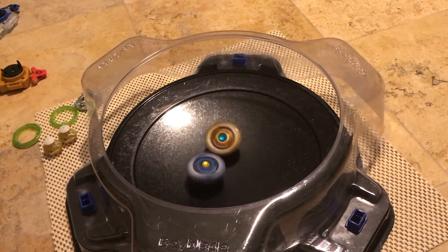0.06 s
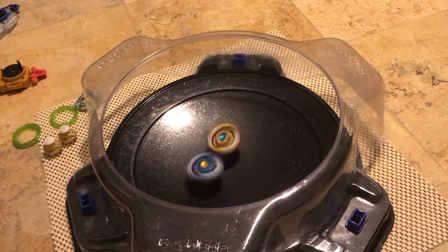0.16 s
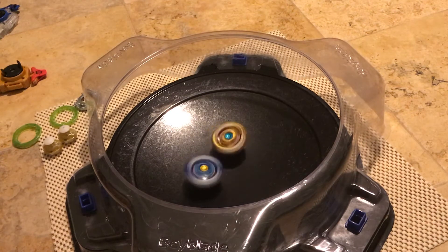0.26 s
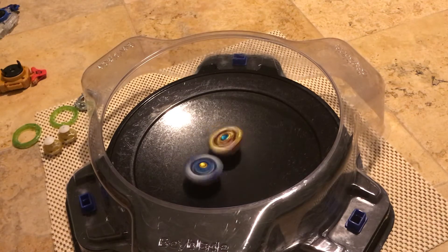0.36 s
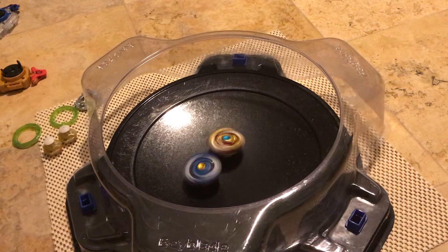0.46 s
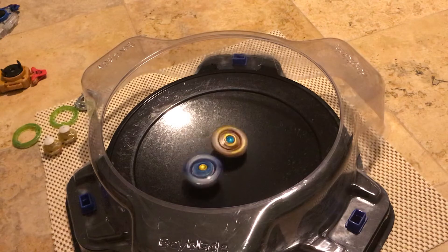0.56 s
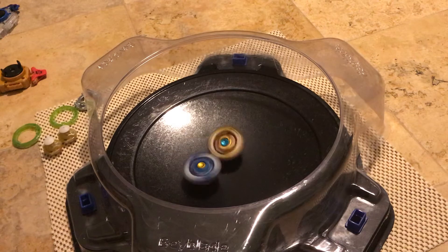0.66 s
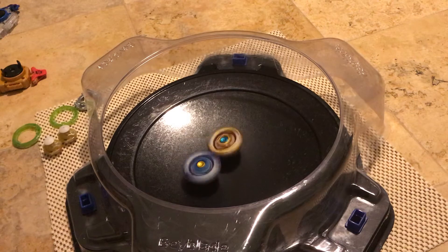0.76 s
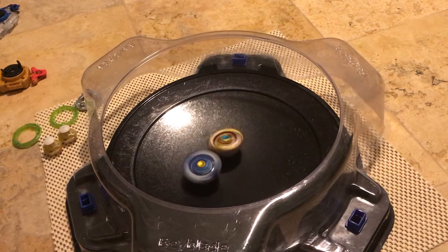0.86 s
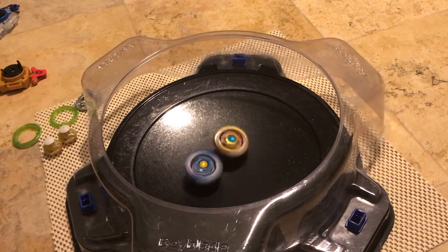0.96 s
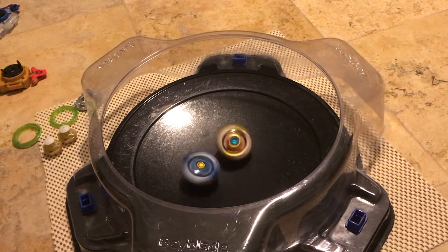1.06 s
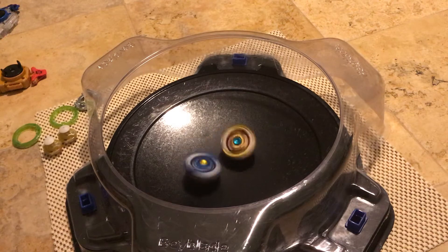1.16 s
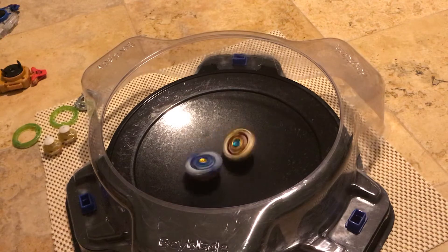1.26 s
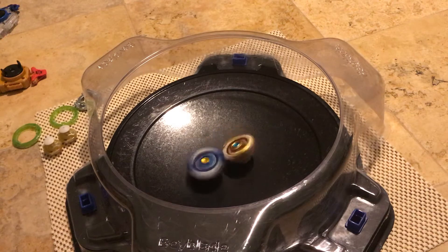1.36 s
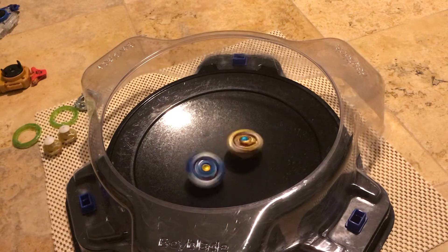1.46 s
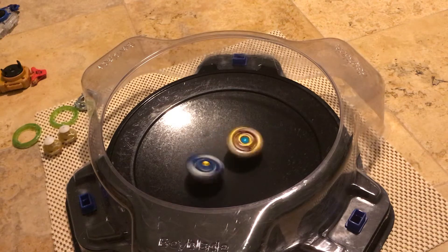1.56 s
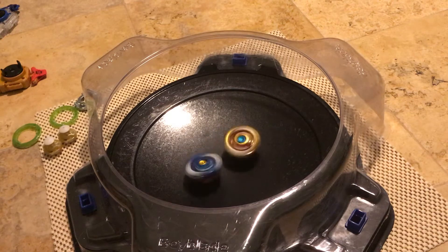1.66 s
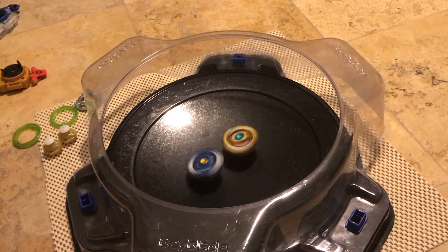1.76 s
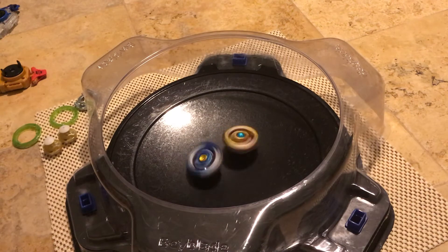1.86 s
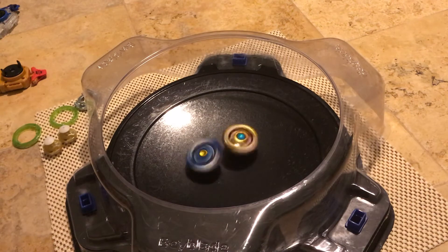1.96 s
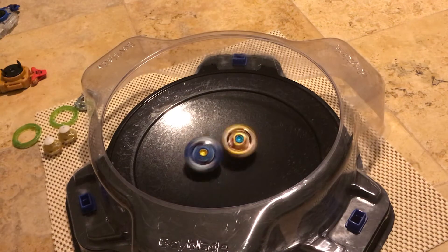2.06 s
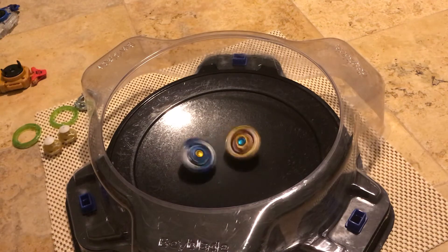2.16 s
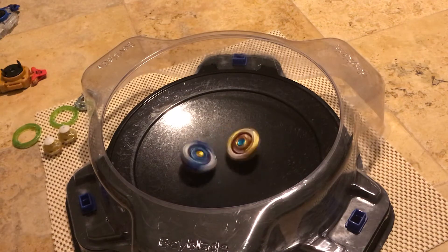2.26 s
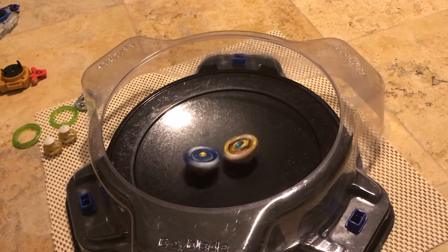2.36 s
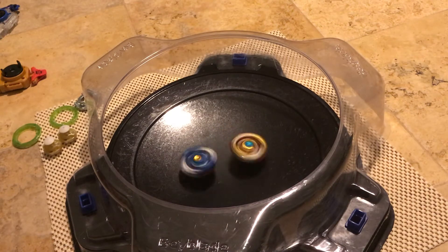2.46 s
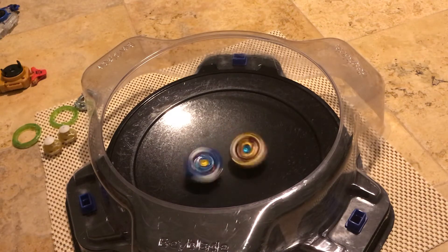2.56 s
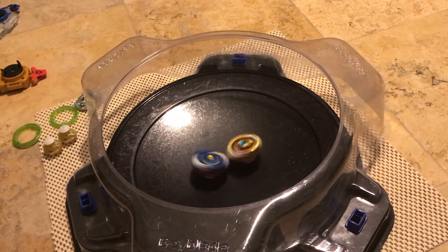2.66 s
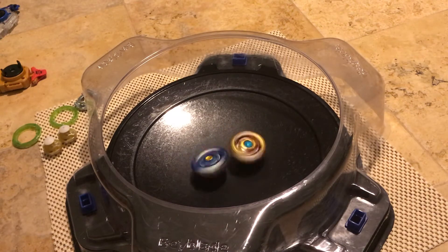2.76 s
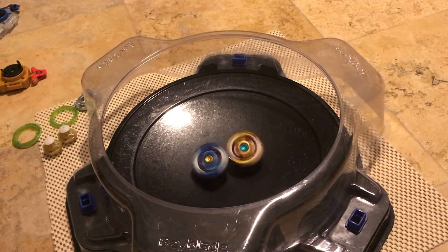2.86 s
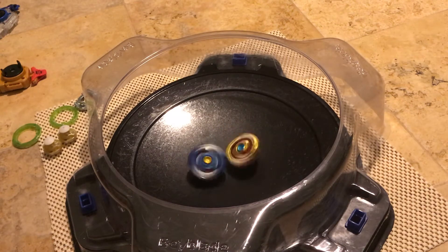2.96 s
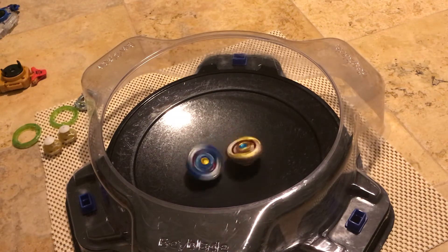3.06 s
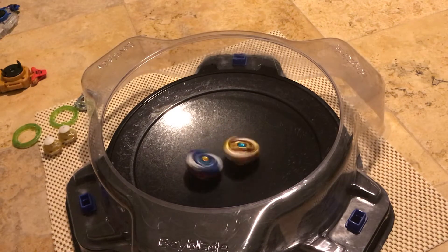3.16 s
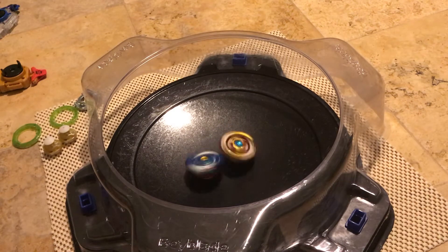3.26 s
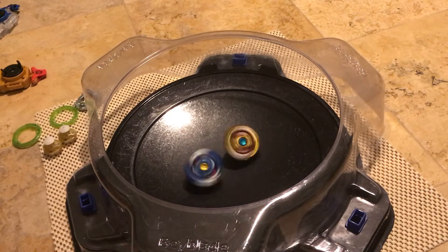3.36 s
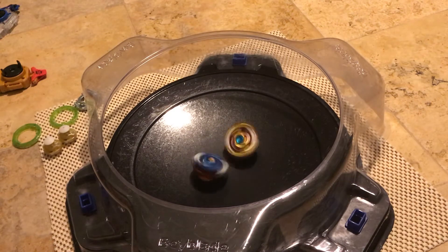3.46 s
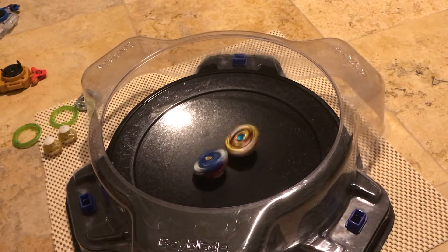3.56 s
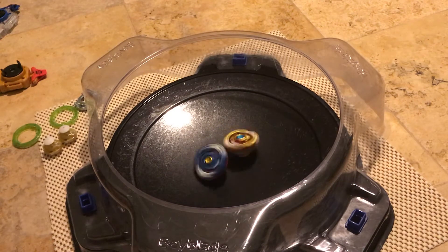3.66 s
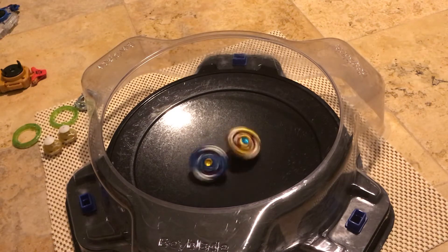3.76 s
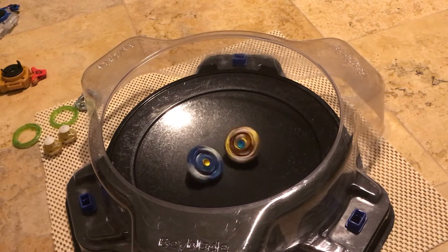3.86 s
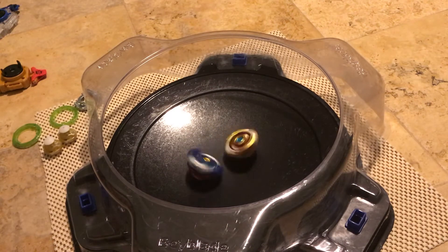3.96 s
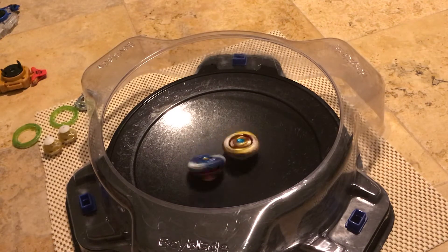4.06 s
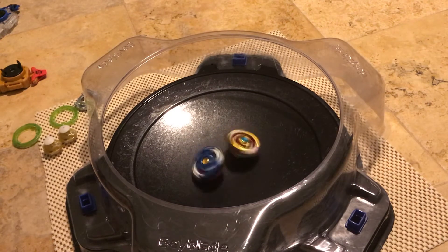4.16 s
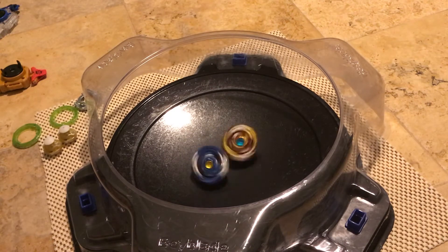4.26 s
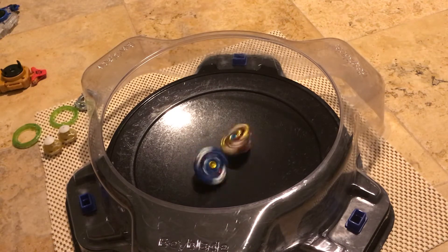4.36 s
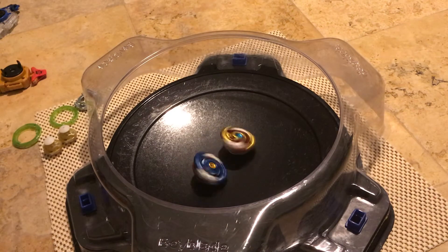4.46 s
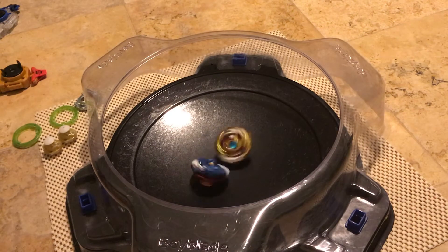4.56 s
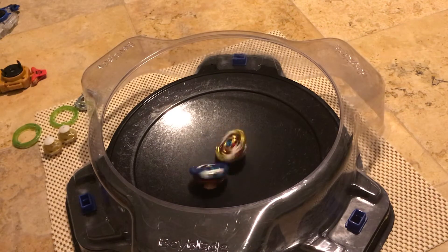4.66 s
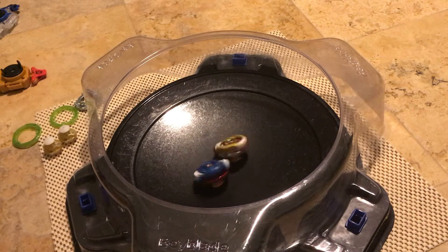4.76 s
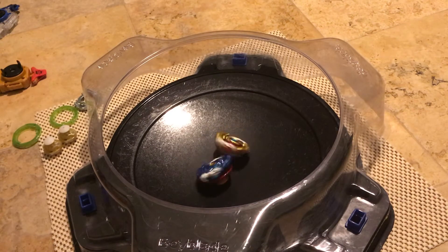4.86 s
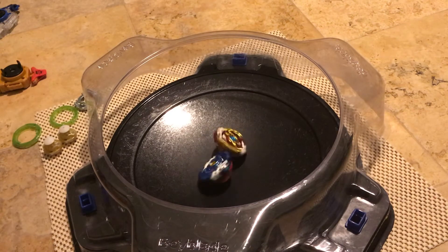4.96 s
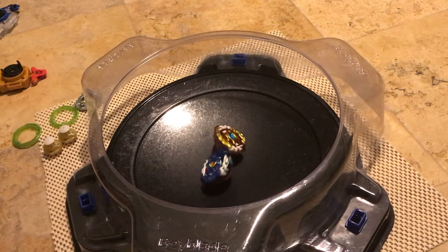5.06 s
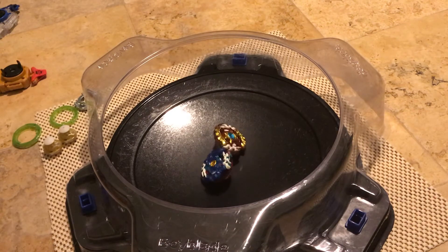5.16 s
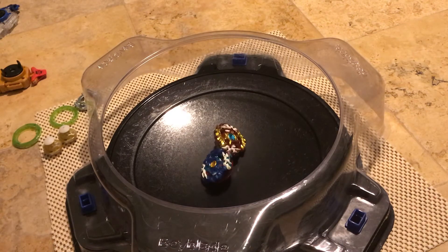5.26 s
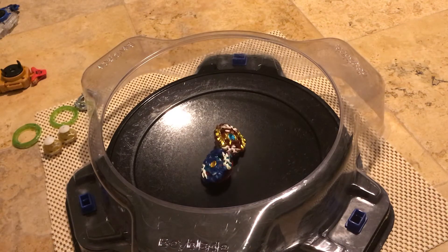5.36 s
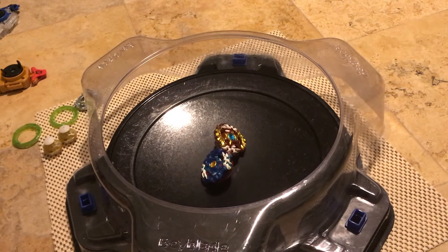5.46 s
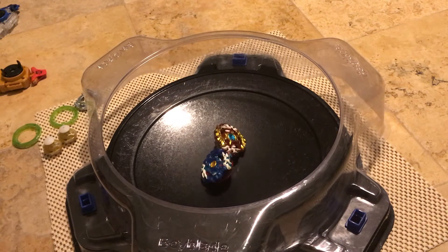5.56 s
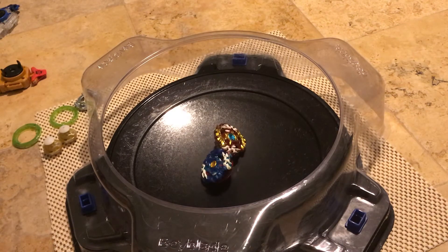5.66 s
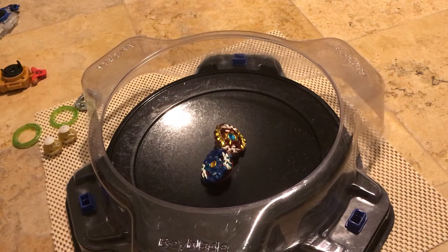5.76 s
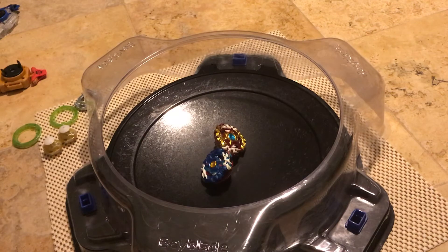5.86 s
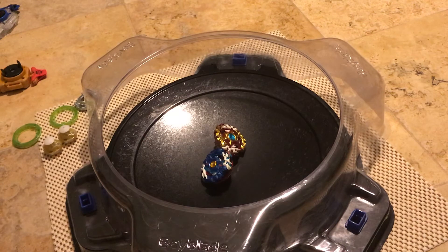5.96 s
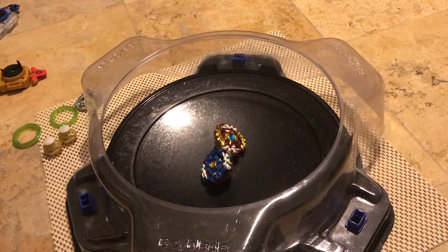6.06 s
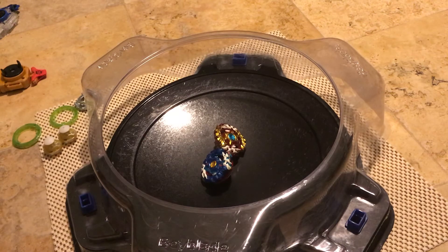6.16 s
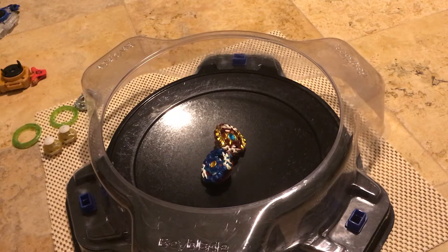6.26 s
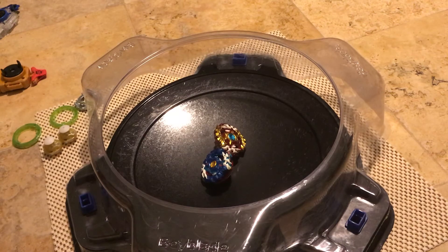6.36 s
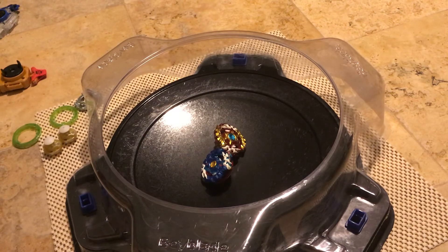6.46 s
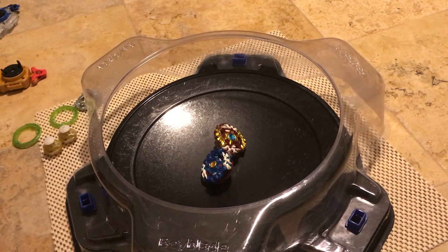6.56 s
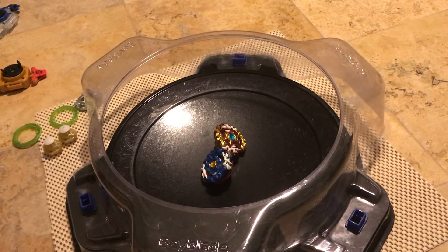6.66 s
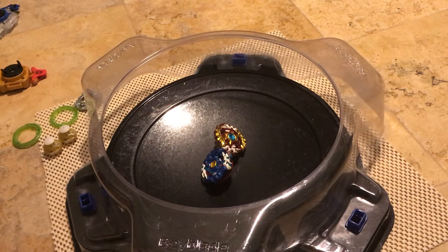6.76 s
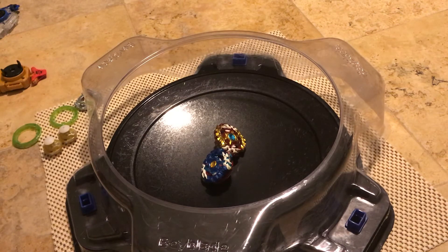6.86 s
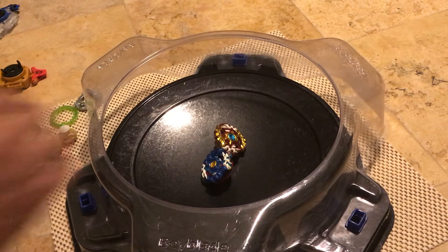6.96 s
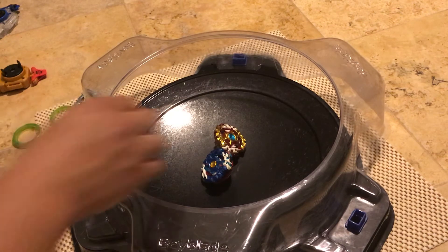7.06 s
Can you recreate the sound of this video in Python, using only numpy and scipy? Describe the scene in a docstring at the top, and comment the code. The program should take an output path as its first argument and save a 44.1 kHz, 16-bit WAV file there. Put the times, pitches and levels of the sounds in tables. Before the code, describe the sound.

Near the microphone, in a reverberant room, two tops whir in a plastic bowl with a thin, gritty, throbbing grind. Faint ticks begin at once; a sharp clack comes at 0.25 s, a close pair near 0.53, then strong cracks at 0.95 and 1.1, and the hardest, brightest snap at about 1.47. Some blows leave a tiny high metallic ring, and the scrape flares after each. From 2.1 to 3.0 medium clacks come in irregular groups, with another bright crack at 3.36. Between 3.7 and 4.95 the hits turn weaker, lower and more rattling as the tops wobble over. Small ticks fade out by 5.35. Then near-silence: faint hiss, low rumble, a barely audible electronic whine, soft cloth swishes around 5.6-5.8 and a very faint squeak. From 6.8 light hand taps and rustling lead to a loud, dry double plastic clack at 7.09, at the very end.

```python
"""Two spinning tops clash and wobble in a plastic bowl on a tiled floor until both fall over.
Impact noise drives the resonances of bowl and rims and rings the metal as decaying modes.
Random grit under the tips makes the grind; cloth is shaped noise, and a hand's raps excite small plastic.
A reverberant room answers, over faint wavering tones, microphone hiss, rumble and an electronic whine."""
import sys
import numpy as np
from scipy import signal
from scipy.fft import rfft, irfft, next_fast_len
from scipy.io import wavfile
from scipy.ndimage import map_coordinates

SR = 44100
rng = np.random.default_rng(int(sys.argv[2]) if len(sys.argv) > 2 else 0)


def to_wav(sig):
    """Store sig (one row per channel, or 1-D mono) as 16-bit WAV at the path in sys.argv[1].

    Samples outside -1..1 are clipped; the rate is SR.
    """
    pcm = np.clip(np.atleast_2d(sig), -1, 1) * 32767
    pcm = np.round(pcm).astype(np.int16)
    wavfile.write(sys.argv[1], SR, pcm.T)  # frames by channels


N = 313551

# Rim against rim: start_s, crack_peak_db, crack_band_hz, broad_db (re main band), treble_peak_db,
# body_peak_db, knock_peak_db, length_ms (to -60 dB), ring_db (one for each metal part)
RIM_CLASHES = [(0.2455, -6.5, 9560, 2.5, -15, -14.5, -29, 31, [-47, -47, -50, -52]),
               (0.5258, -18.5, 5800, 5, -31, -25.5, -29.5, 62, [-59, -63, -58, -56]),
               (0.5401, -8, 8700, 2, -20, -15, -38, 5.7, [-50, -58, -35, -48]),
               (0.8556, -27.5, 5640, 7, -57, -24.5, -40.5, 23, [-73, -69, -66, -72]),
               (0.9477, -14.5, 8970, -4.5, -23, -17, -32.5, 39, [-54, -44, -40, -59]),
               (1.1034, -5, 8700, 1.5, -16, -15, -27.5, 22, [-44, -45, -50, -57]),
               (1.4244, -12.5, 5530, 9, -18, -15, -27, 24, [-32.5, -37, -38, -54]),
               (1.4678, 1.5, 9170, -11.5, -6, -13, -26.5, 14, [-44, -44, -35, -50]),
               (1.9275, -30, 8200, -8, -59, -50, -41, 18, [-76, -72, -72.5, -73]),
               (2.155, -14.5, 7000, 15, -36, -19.5, -31.5, 17.7, [-42, -42.5, -56, -60]),
               (2.4718, -17.5, 9050, 1, -32, -20.5, -30, 29, [-61, -59, -56, -60]),
               (2.4954, -14.5, 8550, -2.5, -40, -22.5, -35.5, 33, [-44, -50, -57, -58]),
               (2.6824, -41, 4500, 1.5, -64, -56, -51, 19, [-75, -51, -75, -67]),
               (2.752, -17.5, 8550, -4.5, -28, -23, -33, 11.3, [-64, -62, -58, -65]),
               (2.8826, -17.5, 7550, 4, -45, -20.5, -34, 3.7, [-65, -67, -58, -66]),
               (2.9488, -22, 5940, 11, -27.5, -23.5, -37, 23, [-70, -63, -62, -62]),
               (3.024, -16, 7500, 15, -37, -21, -31.5, 29, [-43, -53, -54, -35]),
               (3.3577, -7.5, 8940, -21, -14, -20, -28, 14.6, [-58, -64, -37, -53]),
               (3.7206, -28, 5660, 27, -52, -27, -39, 37, [-58, -68, -64, -69]),
               (3.7968, -30.5, 7060, -15, -49, -26.5, -38, 69, [-68, -40, -66, -54]),
               (3.8129, -17, 3500, -3, -26, -19.5, -20.5, 35, [-45, -40, -59, -63]),
               (4.1937, -25, 7780, -81, -27, -25, -54, 56, [-53, -54, -66, -70]),
               (4.4114, -15.5, 7860, 25, -27, -21, -27.5, 57, [-56, -39.5, -61, -60]),
               (4.6925, -19, 7740, 2, -29, -22.5, -24, 69, [-55, -39, -62, -52]),
               (4.7066, -21, 4370, -23, -39, -22.5, -33, 11, [-63, -66, -63, -69]),
               (4.8976, -28.5, 5440, -11, -32, -29.5, -28, 19, [-55, -69, -65, -54]),
               (4.9479, -28.5, 8700, -10, -38, -30.5, -38, 19, [-72, -82, -70, -70])]
# Touches too weak to ring the metal: start_s, crack_peak_db, crack_band_hz, body_peak_db, knock_peak_db
LIGHT_TOUCHES = [(0.025, -39.5, 6860, -40, -53), (0.0425, -35, 7240, -38, -43),
                 (0.0647, -32.5, 4930, -34, -40.5), (0.13, -49, 7440, -55, -51),
                 (0.222, -54, 7050, -65.5, -54), (0.235, -42, 5000, -39, -48),
                 (0.4431, -34, 4300, -30.5, -40.5), (0.708, -43, 3530, -37, -50),
                 (0.7604, -42, 7100, -39.5, -51), (0.7751, -39, 6740, -42, -47),
                 (0.7988, -54, 4650, -39, -51), (1.091, -38, 3500, -40.5, -48.5),
                 (1.306, -35, 8700, -32, -38.5), (1.6823, -36, 5600, -51, -39),
                 (1.7236, -40, 8770, -36, -41), (1.738, -44, 8650, -37, -64),
                 (1.8708, -33.5, 5950, -36, -64), (1.9066, -61, 3620, -38, -55.5),
                 (1.9802, -39.5, 5550, -39.5, -48), (2.0674, -33.5, 5640, -36.5, -52.5),
                 (2.089, -47, 8500, -43, -63), (2.2722, -51, 4490, -50, -50),
                 (2.3495, -34, 5940, -33.5, -41), (2.3727, -38, 4840, -38, -53),
                 (2.4003, -44.5, 4820, -42, -41), (2.4498, -43, 6180, -40, -44),
                 (2.719, -35, 6100, -35.5, -41.5), (2.9864, -35.5, 6660, -32, -55),
                 (3.1899, -57, 3900, -32.5, -46), (3.2743, -44, 9000, -37.5, -39),
                 (3.338, -52, 3500, -49, -58), (3.3538, -20, 3500, -24.5, -54),
                 (3.5507, -46.5, 8900, -37, -40.5), (3.66, -45, 5100, -40, -39.5),
                 (3.7082, -32, 4100, -29.5, -35.5), (3.8236, -22, 5200, -19, -39),
                 (3.8376, -29, 9700, -22, -51), (4.026, -52, 3920, -66, -36),
                 (4.0877, -51, 5010, -39, -39.5), (4.135, -46, 5620, -39, -51),
                 (4.151, -37, 5560, -38, -30.5), (4.1738, -52, 5750, -33.5, -35),
                 (4.3184, -44, 7400, -40.5, -36.5), (4.359, -54, 4684, -48, -47),
                 (4.383, -60, 3500, -47, -58), (4.6591, -63, 3570, -43, -38),
                 (4.7219, -27.5, 4430, -25, -29), (4.8617, -43, 4490, -40, -32),
                 (4.9205, -34.5, 5730, -31, -59), (5.0481, -35.5, 5720, -36.5, -35.5),
                 (5.0592, -49, 5960, -31, -54), (5.1037, -60, 5540, -34.5, -43.5),
                 (5.1752, -54, 4200, -37.5, -44), (5.2436, -46, 3500, -38, -43.5),
                 (5.35, -68.5, 3500, -61.5, -51.5)]
# Modes of the tops' metal parts, one list a part: mode_hz, level_db (re part), t60_s
METAL_PARTS = [
    [(8311, -1.5, .22), (10010, 0.5, .32), (11550, -4, .25)],
    [(4492, 0, .38), (13412, -2.5, .22)],
    [(8972, 0.5, .17), (12590, -0.5, .17)],
    [(15102, 0.5, .25), (13815, -9, .25)],
]
# Low resonances of the bowl: centre_hz, width_hz, level_db
BOWL_KNOCK_MODES = [(91.5, 47, -12), (115.8, 36, -4), (165, 35, -6), (245.2, 40, -3), (311, 27, 2.5),
                    (347.5, 11, 3.5), (410, 21, -0.5), (481.5, 73, -6.5), (610, 44, -4), (760, 110, -7)]
# High resonances of the bowl: centre_hz, width_hz, level_db
BOWL_BODY_MODES = [(982, 240, -6.5), (1127, 75, -1.5), (1163, 66, -4.5), (1543, 92, 4), (1920, 90, -21),
                   (2858, 544, -3), (2852, 180, -1.5), (3268, 720, -1)]
# Tips running on the bowl, before the jolts of clashes: time_s, boom_db, scrape_db
TIP_GRIND = [(0.0, -53.5, -56.5), (0.4, -62, -52.5), (0.85, -70, -63.5), (1.1, -54.5, -49.5),
             (1.6, -58.5, -48.5), (2.05, -61.5, -58), (2.35, -52.5, -49), (2.7, -69, -54.5),
             (3.3, -54, -51), (3.8, -53.5, -53), (4.3, -55, -52.5), (4.7, -53, -53), (4.95, -68.5, -49),
             (5.2, -71.5, -61.5), (5.4, -73, -77)]
# Relative spectrum of the thin fizz of the tips: frequency_hz, level_db
FIZZ_SPECTRUM = [(1760, -26.5), (3000, -13), (3750, -3), (4600, -7), (4930, 11.5), (13000, -8), (16000, -4)]
# Taps of the hand: start_s, peak_db, length_ms (to -60 dB), band_hz, band_db, treble_db
HAND_RAPS = [(6.79, -51, 10, 3960, -4.5, 5), (6.819, -53.5, 8.5, 2270, -5, -27),
             (6.922, -42.5, 22, 3330, 11, -23), (6.94, -46.5, 21, 3540, 11, -13),
             (7, -50, 10, 3410, -7, -22), (7.088, -14.5, 6.9, 2840, -11, -7.5),
             (7.0905, -13, 14, 2690, -9, -29), (7.101, -32, 10, 2520, 15, -16)]
# Resonances of the rapped plastic: centre_hz, width_hz, level_db
RAPPED_MODES = [(990, 64, 6.5), (2080, 150, -2), (2865, 80, 11), (3500, 490, -5.5), (4550, 320, 7.5),
                (6380, 340, -7), (7400, 310, -20), (3210, 7200, -8.5)]
# Sleeve and hand drawing near: time_s, low_db, high_db
HAND_REACH = [(5.399, -80, -85), (5.8, -72, -79.5), (5.97, -70.5, -91), (6.15, -82, -89.5),
              (6.671, -80, -90), (6.8, -66, -76), (6.915, -62, -69.5), (6.928, -55.5, -57.5),
              (6.97, -62, -67.5), (7.11, -64.5, -70)]
# Swishes of cloth: peak_s, low_db, high_db
CLOTH_SWISHES = [(5.626, -79, -62.5), (5.79, -77.5, -62.5)]
# Decay time of the room: frequency_hz, t60_s
ROOM_DECAY = [(150, .5), (500, 0.54), (2000, 0.38), (6000, 0.34), (15000, 0.29)]
# Brief far squeak: start_s, end_s, pitch_hz, level_db (about rms)
FAR_SQUEAK = [(5.81, 6.08, 972, -76), (5.8, 6.15, 1960, -76), (5.85, 6.12, 2411, -77),
              (6.08, 6.2, 2790, -81)]
# Relative spectrum of the rumble: frequency_hz, level_db
RUMBLE_SPECTRUM = [(15, -27.5), (30, -8), (52, 4), (85, -5), (125, -12), (214, -24), (320, -43.5),
                   (550, -120)]
# Swells of the rumble: peak_s, level_db
RUMBLE_SWELLS = [(0.06, -54), (4.45, -60), (4.6, -60), (4.75, -58), (5.35, -51), (5.47, -53), (5.8, -61),
                 (6.28, -64), (6.45, -64)]
# Relative spectrum of the microphone hiss: frequency_hz, level_db
HISS_SPECTRUM = [(88, -27.5), (150, -2.5), (905, -16), (1020, -12), (1790, -19), (1940, -22), (2450, -18),
                 (3040, -17.5), (3490, -22.5), (7180, -25.5), (16000, -25.5)]
# Levels of the whine's harmonics: frequency_hz, level_db (rms)
WHINE_LEVELS = [(994, -83), (3000, -86), (7000, -90), (15000, -98)]

TOUCH_BROAD_DB, TOUCH_TREBLE_DB, TOUCH_MS = -12, -21.5, 22  # re main band, re crack, length
TREBLE_HZ = 10740  # centre of the crack's upper band
EDGE_RISE_S = 0.001
FIZZ_DB = -12  # re scrape while the tops run calm
JOLT_DB = [-47, -45, -50]  # boom, scrape, fizz after a 0 dB crack
JOLT_DB_PER_DB, JOLT_RISE_S, JOLT_T60_S = 0.32, .01, 0.46  # growth with the crack's level, times
SWISH_RISE_S, SWISH_T60_S = .13, .05
DULL_CLOTH = [(150, -37.5), (400, 7), (1500, 2.5), (2900, -4), (3460, -2.0), (4100, -8), (8000, -27)]
THIN_CLOTH = [(1500, -1), (3500, 5.5), (9000, 3.5), (15000, 1.0)]  # both: frequency_hz, level_db
RUMBLE_DB, RUMBLE_RISE_S, RUMBLE_T60_S = -67.5, .07, 1.0
HISS_DB, WHINE_HZ = -69.5, 994.1
ROOM_DB, CEILING, TOP_HZ = -6.0, .97, 15800  # room level, full-scale limit, band limit


def contacts():
    """Impact excitation: a short rattle of edges drives crack, bowl body and knock; hard blows ring metal."""
    out, t = np.zeros((2, N + SR)), np.arange(SR // 3) / SR
    touches = [(s, db, hz, TOUCH_BROAD_DB, db + TOUCH_TREBLE_DB, body, knock, TOUCH_MS, [])
               for s, db, hz, body, knock in LIGHT_TOUCHES]
    for s, db, hz, broad_db, treble_db, body_db, knock_db, ms, rings_db in RIM_CLASHES + touches:
        edges = burst(t, ms)
        crack = struck(edges, bright_band(hz, 1100, 6500, broad_db), db)
        treble = struck(edges, bright_band(TREBLE_HZ, 1800, 12500, -6), treble_db)
        body = struck(edges, bowl_body(), body_db)
        start = round(s * SR)
        sound = crack + treble + body + bowl_knock(t, edges, knock_db)
        # a thin tone beams little into the room: direct and room gains
        sound = sound + metal_ring(t, rings_db) * np.array([[.9], [.6]])
        out[:, start:start + len(t)] += sound
    return out[:, :N]


def bright_band(hz, width, broad_hz, broad_db):
    """Parallel resonance: a main band and a broad part add, then a wide resonance shapes their sum."""
    bands = resonant([(hz, width, 0), (broad_hz, 6000, broad_db)], sign=1)
    outline = resonant([(broad_hz, 9000, 0)])
    return lambda f: bands(f) * outline(f)


def bowl_body():
    """Modal excitation: the place of the blow picks the bowl's modes, varied here at random."""
    modes = [(f * (1 + rng.normal(0, .015)), w, level + rng.normal(0, 3))
             for f, w, level in BOWL_BODY_MODES]
    narrow, broad = resonant(modes), resonant([(2200, 3500, -3)])
    return dulled(lambda f: narrow(f) + broad(f))


def bowl_knock(t, edges, db):
    """Low modal response: the blow reaches the bowl through the tip as one soft push."""
    push = np.exp(-((t - .003) / 0.00053) ** 2)
    return amp(db) * peak(filtered(push + 0.9 * edges, resonant(BOWL_KNOCK_MODES)))


def metal_ring(t, rings_db):
    """Free vibration: where the blow lands decides how strongly each metal part rings."""
    return sum(ring(t, hz, part_db + level + rng.normal(0, 2), t60)
               for part_db, part in zip(rings_db, METAL_PARTS) for hz, level, t60 in part)


def ring(t, hz, db, t60):
    """Mode splitting: the disc is not quite round, so each decaying mode is a close pair that beats."""
    main = np.sin(2 * np.pi * hz * t)
    twin = .35 * np.sin(2 * np.pi * (hz * 1.0025 * t + rng.random()))
    onset = 1 - np.exp(-t / 0.00043)
    return amp(db - 60 * t / max(t60, .01)) * (main + twin) * onset


def grind():
    """Friction excitation: tips skip over uneven grit, throb as the tops wobble, and jolt at a clash."""
    boom, scrape = curves(TIP_GRIND)
    times = [c[0] for c in RIM_CLASHES]
    jolts_db = [JOLT_DB_PER_DB * c[1] for c in RIM_CLASHES]
    jolt = swells(times, jolts_db, JOLT_RISE_S, JOLT_T60_S)
    calm = np.array([boom, scrape, amp(FIZZ_DB) * scrape])
    boom, scrape, fizz = calm + amp(JOLT_DB)[:, None] * jolt
    throb = wobble(28)
    sizes_db = np.minimum(rng.exponential(size=N), 3) * 2  # a few bumps are bigger
    bumps = (rng.random(N) < 1600 / SR) * rng.standard_normal(N)  # about 1600 a second
    grit = unit(bumps * amp(sizes_db + 3.5 * throb + 2 * wobble(70)))
    grit = grit + 0.32 * rng.standard_normal(N)  # fine dust under the bumps
    low = unit(amp(2.5 * wobble(40)) * filtered(grit, resonant(BOWL_KNOCK_MODES)))
    narrow, broad = resonant(BOWL_BODY_MODES), resonant([(2400, 4500, -4)])
    mid = unit(filtered(grit, dulled(lambda f: narrow(f) + broad(f))))
    high = unit(amp(2.5 * throb + 2 * wobble(90)) * noise(FIZZ_SPECTRUM))
    return boom * low + scrape * mid + fizz * high


def raps():
    """Impact excitation of a small plastic body: short noise bursts drive its resonances."""
    out, t = np.zeros((2, N + SR)), np.arange(SR // 10) / SR
    plastic = resonant(RAPPED_MODES)
    for s, db, ms, hz, band_db, treble_db in HAND_RAPS:
        accent = resonant([(hz, 250, band_db), (9000, 9000, treble_db)], sign=1)
        start = round(s * SR)
        out[:, start:start + len(t)] += struck(burst(t, ms), lambda f: plastic(f) + accent(f), db)
    return out[:, :N]


def rustle():
    """Friction noise of cloth and skin: a dull rush and a thin one; swishes build up and stop short."""
    times, low_db, high_db = np.transpose(CLOTH_SWISHES)
    low, high = curves(HAND_REACH)
    low = low + swells(times, low_db, SWISH_RISE_S, SWISH_T60_S)
    high = high + swells(times, high_db, SWISH_RISE_S, SWISH_T60_S)
    thin = amp(0.62 * wobble(63)) * noise(THIN_CLOTH)
    return low * noise(DULL_CLOTH) + high * thin


def room(x):
    """Reverberation: each frequency decays at its own rate; the answer changes as the tops move about."""
    out, step = np.zeros(N + 2 * SR), SR // 5
    for a in range(0, N, step):
        hz, t, z = signal.stft(rng.standard_normal(SR * 3 // 4), SR, nperseg=256)
        decay = amp(-60 * t / along(ROOM_DECAY, hz)[:, None])
        tail = signal.istft(z * decay, SR, nperseg=256)[1]
        wet = signal.fftconvolve(x[a:a + step], tail / np.linalg.norm(tail))
        out[a + 130:][:len(wet)] += wet  # first walls after 3 ms
    return out[:N]


def faint_tones():
    """Modulated sinusoids: thin tones waver in level and phase between soft edges."""
    t, out = np.arange(N) / SR, np.zeros(N)
    for start, end, hz, db in FAR_SQUEAK:
        edge = np.clip(np.minimum(t - start, end - t) / .05, 0, 1)
        level = amp(db + 3 + 2 * wobble(25))  # 3 dB turns rms into sine amplitude
        out += edge * level * np.sin(2 * np.pi * hz * t + .9 * wobble(35))
    return out


def rumble():
    """Low-frequency noise: an unsteady rumble rises in swells above a constant floor."""
    level = amp(RUMBLE_DB) + swells(*np.transpose(RUMBLE_SWELLS), RUMBLE_RISE_S, RUMBLE_T60_S)
    return level * unit(amp(2.2 * wobble(5.3)) * noise(RUMBLE_SPECTRUM))


def whine():
    """Harmonic series: a steady electronic comb of fifteen sinusoids on one fundamental."""
    t, out = np.arange(N) / SR, np.zeros(N)
    for hz in WHINE_HZ * np.arange(1, 16):
        level = amp(along(WHINE_LEVELS, hz)) * np.sqrt(2)
        out += level * np.sin(2 * np.pi * (hz * t + rng.random()))
    return out


def hiss():
    """Stationary random noise of the microphone, coloured by its spectrum."""
    return amp(HISS_DB) * noise(HISS_SPECTRUM)


def burst(t, ms):
    """Transient noise: edges rattle against each other and decay by 60 dB over the given length."""
    return rng.standard_normal(len(t)) * (1 - np.exp(-t / EDGE_RISE_S)) * amp(-60 * t / (max(ms, 1) / 1000))


def struck(edges, response, db):
    """Direct and diffuse radiation: the near sound, and the room's share evened over all directions."""
    near = amp(db) * peak(filtered(edges, response))
    blow = filtered(np.arange(len(edges)) == 0, response)  # impulse response
    blow = blow * np.linalg.norm(near) / np.linalg.norm(blow)
    return np.array([near, .55 * near + .83 * blow])


def resonant(modes, sign=-1):
    """Modal superposition of causal band-pass resonances; neighbours alternate in sign unless sign is 1."""
    def response(f):
        return sum(sign ** k * amp(db) * 1j * f * width / (hz * hz - f * f + 1j * f * width)
                   for k, (hz, width, db) in enumerate(modes))
    return response


def dulled(response):
    """Transmission loss: thick plastic passes little treble."""
    return lambda f: response(f) / (1 + 1j * f / 5500) ** 2


def filtered(x, response):
    """Linear filtering: the spectrum of x times a response of frequency."""
    m = next_fast_len(len(x) + 8192)
    return irfft(rfft(x, m) * response(np.fft.rfftfreq(m, 1 / SR)), m)[:len(x)]


def noise(spectrum):
    """Spectral shaping: white noise coloured and scaled to rms 1."""
    return unit(filtered(rng.standard_normal(N), lambda hz: amp(along(spectrum, hz))))


def swells(times, levels_db, rise_s, t60):
    """Exponential envelopes, summed: each gains 30 dB over rise_s up to its peak, then dies away."""
    t = np.arange(N) / SR
    return sum(amp(db + np.where(t < s, 30 * (t - s) / rise_s, 60 * (s - t) / t60))
               for s, db in zip(times, levels_db))


def curves(rows):
    """Decibel interpolation: one gain a sample for each level column, at -150 dB outside the rows."""
    s, *columns = np.transpose(rows)
    return [amp(np.interp(np.arange(N) / SR, s, db, -150, -150)) for db in columns]


def wobble(rate):
    """Random modulation: a smooth curve through rate random knots a second."""
    return map_coordinates(rng.standard_normal(int(N * rate / SR) + 4), [np.arange(N) * rate / SR])


def along(points, hz):
    """Logarithmic frequency scale: values interpolated between (hz, value) points."""
    f, v = np.transpose(points)
    return np.interp(np.log(hz + 1), np.log(f + 1), v)


def amp(db):
    """Decibel law: the amplitude gain of a level."""
    return 10 ** (np.asarray(db) / 20)


def unit(x):
    """Power normalisation: scaled to rms 1."""
    return x / np.sqrt(np.mean(x ** 2) + 1e-20)


def peak(x):
    """Peak normalisation: scaled to peak 1."""
    return x / np.max(np.abs(x))


def scene():
    """Superposition: tops and hand, their room answer and the background add linearly."""
    near, far = contacts() + raps()
    steady = grind() + rustle()
    answer = amp(ROOM_DB) * room(far + 0.13 * steady)
    background = faint_tones() + rumble() + whine() + hiss()
    return (near + answer + steady + background)[None]


def record(dry):
    """Band limiting and saturation: deep bass drops, peaks round off near full scale, top is cut."""
    x = filtered(dry[0], lambda hz: hz ** 4 / (hz ** 4 + 40 ** 4))
    x = x / (1 + np.abs(x / CEILING) ** 8) ** (1 / 8)
    return filtered(x, lambda hz: 1 / (1 + (hz / TOP_HZ) ** 200))[None]


dry = scene()
out = record(dry)
to_wav(out)
```